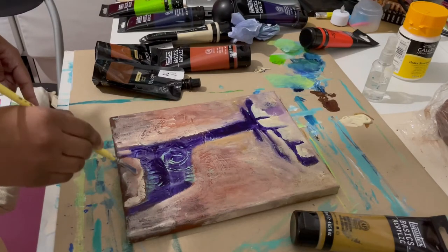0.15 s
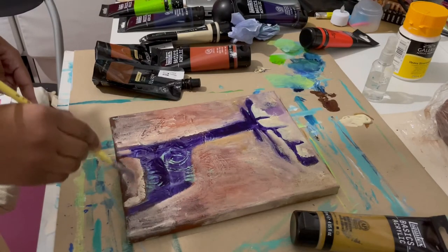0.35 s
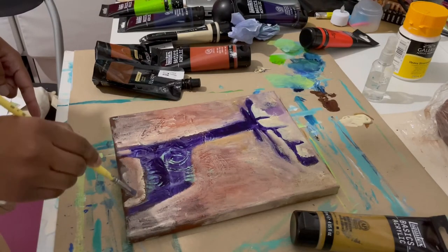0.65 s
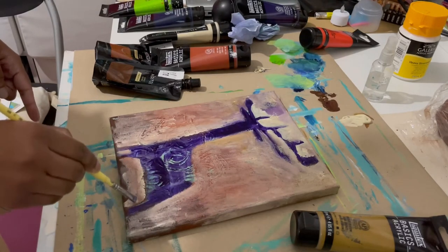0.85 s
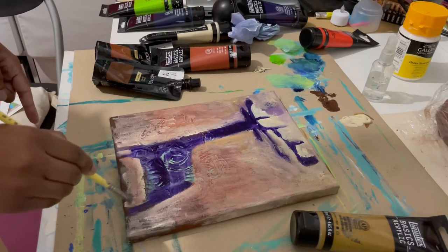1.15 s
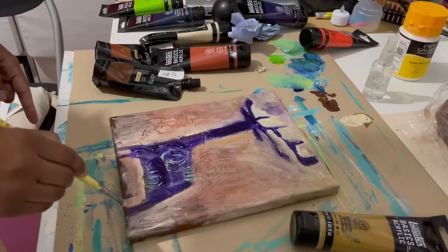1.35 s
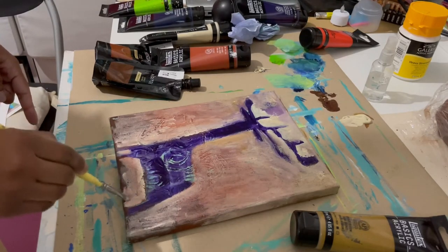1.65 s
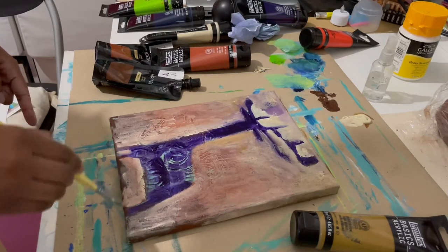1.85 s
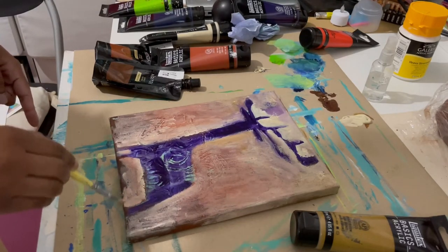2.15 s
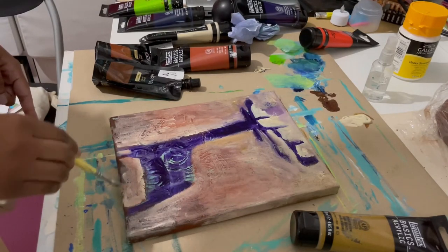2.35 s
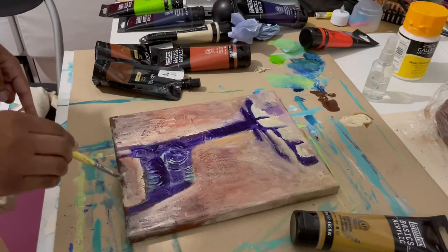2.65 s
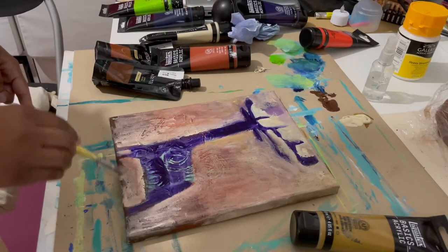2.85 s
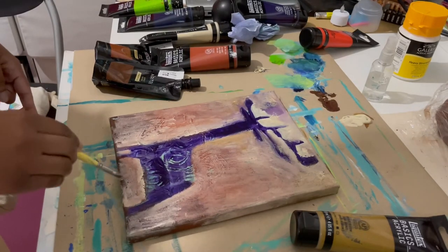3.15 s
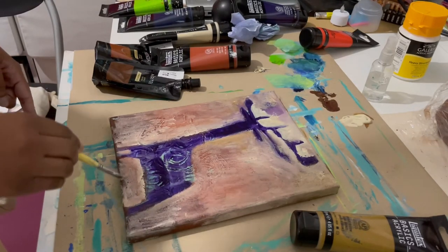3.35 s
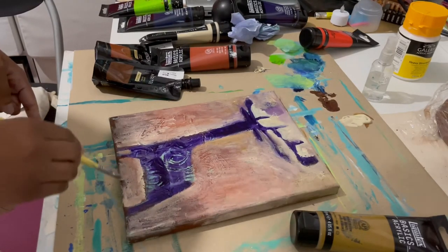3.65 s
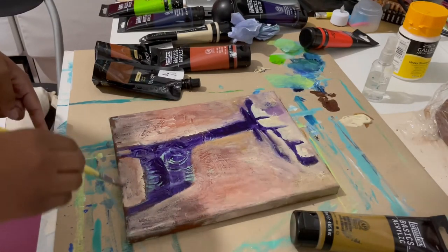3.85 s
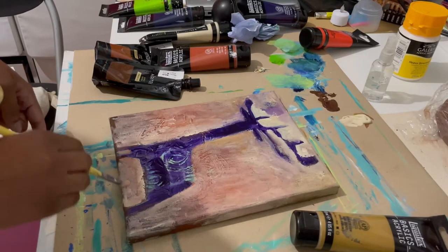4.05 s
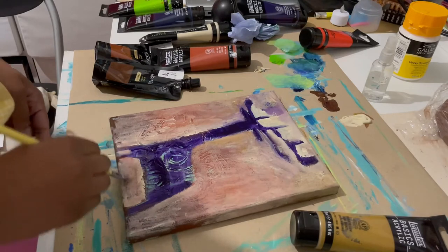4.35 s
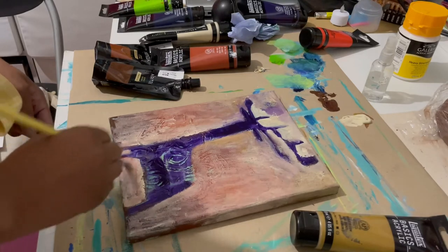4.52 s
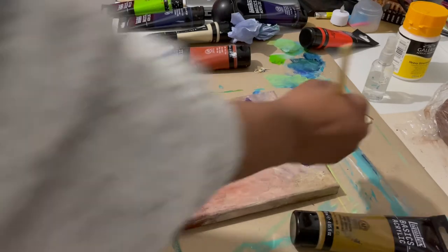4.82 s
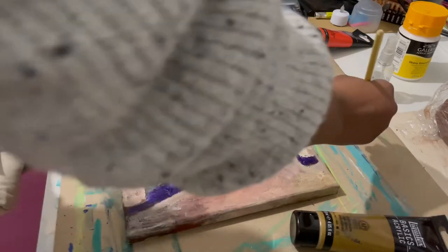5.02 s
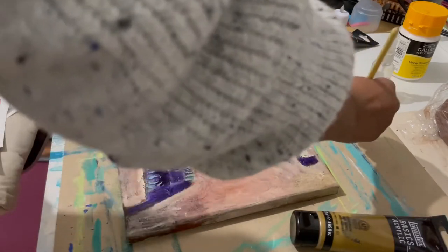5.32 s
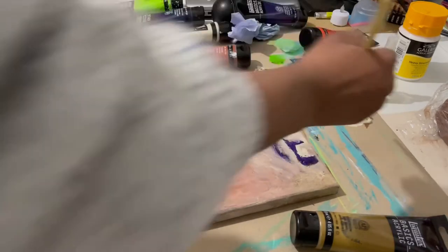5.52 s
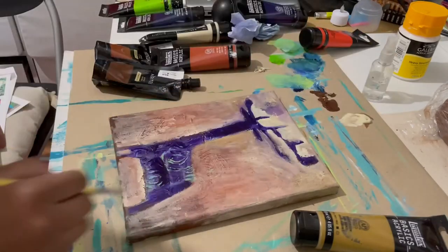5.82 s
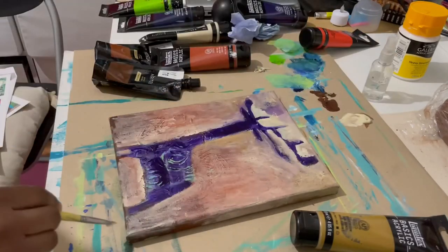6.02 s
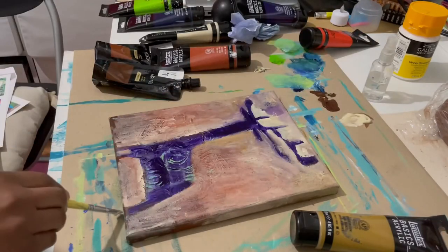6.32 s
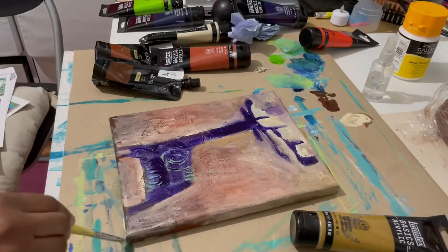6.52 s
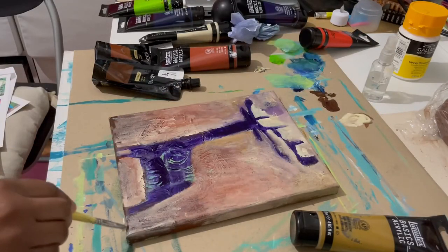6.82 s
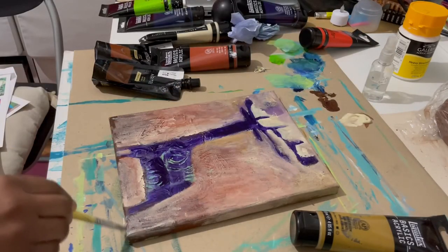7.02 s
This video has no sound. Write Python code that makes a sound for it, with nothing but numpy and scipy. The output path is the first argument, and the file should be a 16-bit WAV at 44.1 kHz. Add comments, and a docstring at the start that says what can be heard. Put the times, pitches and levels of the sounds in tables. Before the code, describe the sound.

A small stiff paintbrush scrubs dried paint on a stretched canvas in short, quick, hissy strokes, soft at first and then firmer. The canvas frame knocks once against the table. The brushing stops, a wool sleeve rustles among a few small taps, and then the scratchy strokes return. It is all quiet and close to the microphone, over a faint low room rumble and hum.

```python
"""At a table in a quiet room, a small stiff brush scrubs dried paint on a stretched canvas in quick strokes.
Stick-slip friction of the bristles makes a hiss and drives resonances of the ferrule and the cloth.
The frame is knocked once and rings in its modes; a wool sleeve rustles as it reaches over the table
for paint, among small taps. The room rumbles in its standing waves and hums. A phone with two
microphone ports listens from close by."""
import sys
import numpy as np
from scipy import signal
from scipy.fft import rfft, irfft, next_fast_len
from scipy.io import wavfile
from scipy.ndimage import uniform_filter1d

SR = 44100
rng = np.random.default_rng(int(sys.argv[2]) if len(sys.argv) > 2 else 0)


def pcm_store(signal):
    """Save signal as 16-bit PCM."""
    levels = np.round(np.clip(np.atleast_2d(signal), -1, 1) * 32767)
    wavfile.write(sys.argv[1], SR, levels.astype(np.int16).T)


N = 316461

# Bright spectrum of bristle hiss, snaps and loose fibres: frequency_hz, gain_db
HISS_SPECTRUM = [(1500, -7.5), (3500, -11), (6000, -8.5), (8500, -2), (10500, -3.5), (13000, -0.5),
                 (14600, -3), (15700, -18)]
# Modes of the cloth and its frame: pitch_hz, width_hz, gain_db
CANVAS_MODES = [(320, 70, -6), (545, 55, -5), (662, 50, 0), (850, 110, -5), (1095, 70, -6), (1260, 60, -9),
                (1520, 90, -10), (2050, 250, -20), (3700, 900, -24)]


def amp(db):
    """Decibels as an amplitude ratio."""
    return 10 ** (np.asarray(db) / 20)


def unit_rms(x):
    """Normalisation to a mean power of 1."""
    return x / np.sqrt(np.mean(x ** 2) + 1e-30)


def add(mix, start_s, sound):
    """Superposition of a sound onto the mix."""
    part = mix[round(start_s * SR):][:len(sound)]
    part += sound[:len(part)]


def bins():
    """Frequencies of a Fourier transform a little longer than the scene."""
    return np.fft.rfftfreq(next_fast_len(N + 8192, True), 1 / SR)


def curve(table, column=1):
    """Interpolation of one column over the bins, on a log-frequency axis."""
    columns = np.transpose(table)
    return np.interp(np.log(bins() + 1), np.log(columns[0] + 1), columns[column])


def spectrum(table):
    """Magnitude response through points of frequency and gain."""
    return amp(curve(table))


def modes(table):
    """Modal superposition: damped resonances add, neighbours moving in opposite sense."""
    hz = bins()
    return sum((-1) ** k * amp(db) * 1j * hz * width / (pitch * pitch - hz * hz + 1j * hz * width)
               for k, (pitch, width, db) in enumerate(table))


def colour(x, gain):
    """Linear filtering that preserves the power of white noise."""
    size = 2 * len(gain) - 2
    return irfft(rfft(x, size) * gain, size)[..., :N] / np.sqrt(np.mean(abs(gain) ** 2))


def resonate(x, hz, width_hz):
    """A moving resonance by heterodyning: shift hz down to zero, smooth twice, shift back."""
    carrier = np.exp(2j * np.pi * np.cumsum(hz) / SR)
    pole = np.exp(-np.pi * width_hz / SR)
    baseband = signal.lfilter([(1 - pole) ** 2], [1, -2 * pole, pole * pole], x / carrier)
    return (carrier * baseband).real * np.sqrt(8 / (1 - pole))


def slips(per_s, spread_db):
    """Shot noise: dense tiny slips of uneven size, in two independent rows."""
    size = amp(spread_db * np.minimum(rng.exponential(1, N), 4))
    return unit_rms(size * rng.standard_normal((2, N)) * (rng.random(N) < per_s / SR))


def flicker(corner_hz, depth_db):
    """Random modulation: a factor near 1 that follows low-passed noise."""
    knots = rng.standard_normal(int(N / SR * 400))
    knots = unit_rms(signal.lfilter([1], [1, -np.exp(-2 * np.pi * corner_hz / 400)], knots))
    return amp(depth_db * np.interp(np.arange(N) / SR * 400, np.arange(len(knots)), knots))


def room():
    """Noise excites the room's standing waves, over a faint noise floor and a wavering hum."""
    # Noise floor of room and microphone: frequency_hz, gain_db
    floor_spectrum = [(20, -15), (40, -17.5), (70, -6), (250, -17.5), (400, -20.5), (480, -26), (950, -29),
                      (1300, -44.5), (2500, -52.5), (6000, -59.5), (10000, -56.5), (13000, -48.5),
                      (14200, -52), (14800, -114)]
    # Standing waves: pitch_hz, width_hz, gain_db (the response is applied twice)
    room_modes = [(52.3, 12, -7), (66.8, 17.3, -8), (90.2, 7, -5.5), (129.9, 10.1, -8), (179.9, 20.9, -9.5),
                  (287.6, 20.8, -10), (318.5, 10.9, -9), (352.5, 20.9, -11.5), (675.5, 60, -16),
                  (1090, 15, -37.5)]
    floor_noise, rumble_noise = rng.standard_normal((2, 2, 2 * len(bins())))
    floor = amp(-47.5) * colour(floor_noise, spectrum(floor_spectrum))
    rumble = amp(-45) * colour(rumble_noise, modes(room_modes) ** 2)
    hum_hz = 49.2 * flicker(2.5, depth_db=.35)
    hum = np.sqrt(2) * np.sin(2 * np.pi * np.cumsum(hum_hz) / SR) * flicker(3, depth_db=1.8)
    return floor + rumble + amp(-45) * hum * [[1], [0]]


def reverberation(x):
    """Reflections off the table and walls decay exponentially, the treble first."""
    low_t60_s, high_t60_s = .3, .16
    t = np.arange(8000) / SR
    noise = rng.standard_normal((2, len(t)))
    low = signal.lfilter(*signal.butter(2, 3500, fs=SR), noise)
    tail = low * amp(-60 * t / low_t60_s) + (noise - low) * amp(-60 * t / high_t60_s)
    return signal.fftconvolve(x, tail / np.linalg.norm(tail[0]), axes=1)[:, :N]


def sleeve():
    """Sliding friction of wool on wool and card: a dull rustle swells and fades as loose fibres fizz."""
    # Swishes of the sleeve: peak_s, rise_s, fall_s, level_db, fizz_over_level_db
    swishes = [(4.7, .3, 0.24, -73, -12), (5.03, 0.038, 0.11, -70, 2.5), (5.16, .03, .05, -83, 9),
               (5.22, 0.029, 0.075, -65.5, -9), (5.3, 0.059, 0.059, -57, -4),
               (5.447, 0.022, 0.053, -50.5, -8), (5.68, 0.11, 0.079, -54.5, -20),
               (5.81, 0.068, 0.043, -62, -15)]
    # Friction noise of wool: frequency_hz, gain_db
    wool_spectrum = [(350, -8.5), (800, -3), (2000, -10.5), (4000, -15), (7000, -19), (12000, -20),
                     (14500, -31), (15200, -46)]
    t, power = np.arange(N) / SR, np.zeros((2, N))
    for peak_s, rise_s, fall_s, level_db, fizz_db in swishes:
        from_peak = np.maximum((peak_s - t) / rise_s, (t - peak_s) / fall_s)
        power += amp(level_db + np.c_[[0, fizz_db]] - 8 * from_peak ** 2) ** 2
    rustle_level, fizz_level = np.sqrt(power)
    grain = flicker(30, depth_db=.8) * slips(12000, spread_db=1.5)
    rustle = colour(rustle_level * grain, spectrum(wool_spectrum))
    return rustle + colour(fizz_level * slips(12000, spread_db=3.5), spectrum(HISS_SPECTRUM))


def frame_thud(force):
    """A soft contact, wood on card, low-passes the force that excites the canvas modes."""
    blunt = signal.lfilter(*signal.butter(2, 1500, fs=SR), force * slips(9000, spread_db=.3))
    return amp(13.5) * colour(blunt, modes(CANVAS_MODES))


def taps():
    """Brief impacts have broad spectra: each is a bright snap with some thud of the frame."""
    # Small impacts: start_s, snap_db, thud_force_db
    impacts = [(4.583, -71, -59), (4.655, -59, -81), (4.996, -75, -51.5), (5.11, -56, -75),
               (5.119, -46, -73), (5.204, -75, -55), (5.334, -49, -73), (6.929, -50, -57), (7.04, -58, -66)]
    t = np.arange(512) / SR
    snap, force = np.zeros((2, N))
    for start_s, snap_db, force_db in impacts:
        add(snap, start_s, amp(snap_db) * np.exp(-t / .0031))
        add(force, start_s, amp(force_db) * t / .0051 * np.exp(-t / .0053))
    return frame_thud(force) + colour(snap * rng.choice([-1., 1.], (2, N)), spectrum(HISS_SPECTRUM))


def knock():
    """Impact excitation: the frame grazes the table, strikes with a crack and judders as low modes ring."""
    strike_s, graze_s, judder_s, crack_decay_s = 4.066, .008, .03, .039
    sag_db_per_s, fall_db_per_s, loss_db_per_cycle = 105, 900, .2
    t = np.arange(N) / SR - strike_s
    judder_db = -50 - sag_db_per_s * t - fall_db_per_s * np.maximum(t - judder_s, 0)
    force = amp(np.where(t < 0, -57, judder_db)) * (t > -graze_s)
    ring = sum(amp(15 + db - loss_db_per_cycle * hz * abs(t)) * np.sin(2 * np.pi * (hz * t + rng.random()))
               for hz, _, db in CANVAS_MODES if hz < 1600)
    burst = amp(-52) * np.exp(-abs(t) / crack_decay_s) * (t > 0) * slips(11000, spread_db=.4)
    crack = resonate(burst, np.full(N, 3300.), width_hz=2800)
    return uniform_filter1d(force, 400) * ring + frame_thud(force) + crack


def stroke_envelopes(strokes):
    """Incoherent strokes add in power, giving one envelope each for hiss, scratch and canvas."""
    lag_s = [0, .004, .007]  # the tips hiss first; scratch and canvas follow as the brush bears down
    land_s, fade_db = .035, 4  # every stroke lands equally fast, bites early and then eases
    t, power = np.arange(N) / SR, np.zeros((3, N))
    for start_s, length_s, hiss_db, scratch_db, canvas_db in strokes:
        span = slice(max(round((start_s - .15) * SR), 0), round((start_s + length_s + .25) * SR))
        since_s = t[span] - start_s - np.c_[lag_s]
        travel = 2 * since_s / max(length_s, .01) - 1  # -1 at the start, 1 at the end
        landing, lifting = 1 - since_s / land_s, .86 * travel
        edge = np.maximum(np.maximum(landing, lifting), 0) ** 2.59
        shape_db = -13 * edge / (1 + .13 * edge) - fade_db * np.clip(travel, -1, 1) / 2
        power[:, span] += amp(shape_db + hiss_db + np.c_[[0, scratch_db, canvas_db]]) ** 2
    drift = np.array([flicker(18, depth_db=1.3) for layer in power])
    return np.sqrt(power) * drift * flicker(25, depth_db=.5)  # the ridges are uneven


def brush():
    """Stick-slip friction on ridges of paint: bristles hiss, scratch and drive the ferrule and cloth."""
    # Brush strokes: start_s, length_s, hiss_db, scratch_over_hiss_db, canvas_over_hiss_db
    strokes = [(0.018, 0.071, -56, -2, -2.5), (0.141, 0.063, -60.5, -7, -17), (0.229, 0.13, -62, -4, -1.5),
               (0.38, 0.046, -71, -15, 3), (0.463, 0.07, -72, -19.9, 0), (0.586, 0.039, -64, -25, -6),
               (0.676, 0.096, -58, -13, -9.5), (0.808, 0.034, -68, -11, 2), (0.872, 0.061, -72, -22, 2.5),
               (0.925, 0.09, -56.5, -22, -10), (1.057, 0.076, -56.5, -12, -13),
               (1.162, 0.088, -53.5, -24, -23), (1.312, 0.059, -59.1, -12, -20),
               (1.382, 0.079, -47, -11, -25), (1.485, 0.15, -60, -16, -19), (1.638, 0.03, -55.5, -9.5, -13),
               (1.734, 0.069, -54, -7, -34), (1.868, 0.061, -58, -16, -8.5), (1.962, 0.11, -68.5, -32, -11),
               (2.06, 0.056, -65, -31, -25), (2.117, 0.08, -52.5, -15, -34), (2.251, 0.13, -57.5, -32, -25),
               (2.368, 0.093, -48, -5.5, -17), (2.515, 0.048, -48, -7.5, -12.5),
               (2.63, 0.1, -55, -32, -15.5), (2.768, 0.077, -53, -12.5, -24),
               (2.882, 0.066, -47.5, -8, -23), (2.988, 0.085, -50, -7.5, -36),
               (3.111, 0.078, -47, -10, -25), (3.23, 0.071, -50, -6.5, -28), (3.342, 0.08, -46.5, -12, -34),
               (3.467, 0.077, -47.5, -8.5, -23), (3.588, 0.06, -51, -8, -34), (3.713, 0.1, -50.5, -6, -36),
               (3.891, 0.11, -56.5, -25, -7), (3.989, 0.076, -47, -22, -4.5),
               (4.108, 0.11, -43.5, -15.5, -8), (4.262, 0.07, -50, -16, -10),
               (4.369, 0.096, -47.5, -12, -12), (5.037, 0.035, -57, -3, -3), (5.425, 0.038, -61, -10, -9),
               (6.199, 0.068, -70, 5.5, -17), (6.31, 0.15, -48.5, -6.5, -24.5),
               (6.504, 0.11, -52, -6, -15.5), (6.663, 0.1, -48, -8.5, -20.8),
               (6.833, 0.084, -55.5, -4.5, -7.5), (6.928, 0.08, -46.5, -8.5, -16),
               (7.003, 0.052, -53, -5, 2), (7.103, 0.24, -55.5, -2.5, 1)]
    # Resonances at the spot under the brush: time_s, scratch_hz, cloth_ring_hz, cloth_ring_db
    spots = [(.02, 5460, 860, 8.5), (.3, 5030, 834, 8), (.45, 5000, 1200, -11), (.68, 4140, 1600, -0.5),
             (.93, 4630, 1440, 5), (1.15, 5130, 1430, 10.5), (1.4, 5640, 1540, 0), (1.75, 5440, 2030, -20),
             (2.0, 4530, 1270, 6), (2.37, 4030, 1800, 0), (2.75, 4080, 1920, 6.5), (3.0, 4730, 1400, -1),
             (3.7, 4840, 1820, 4), (3.99, 6000, 1100, -21), (4.11, 3940, 1930, -2.5), (4.3, 5060, 1180, -6),
             (5.04, 2920, 1010, 5.5), (6.2, 3840, 1650, 14), (6.5, 3860, 1340, 5), (6.67, 3750, 2190, -5),
             (7.0, 4200, 1820, -2.5), (7.11, 3400, 1310, -9)]
    # Modes of ferrule and handle: pitch_hz, width_hz, gain_db
    ferrule_modes = [(3200, 400, -4), (3800, 450, -6), (5100, 250, 0)]
    regrip_s = 6.0  # the ferrule rings more once the brush is held lower
    t, starts = np.arange(N) / SR, np.transpose(strokes)[0]
    spot_s, *spot_columns = np.transpose(spots)
    scratch_hz, ring_hz, ring_db = (np.interp(starts, spot_s, column) for column in spot_columns)
    miss = rng.standard_normal((len(strokes), 2)).T  # each stroke lands a little off its spot
    scratch_hz, ring_hz = np.array([scratch_hz, ring_hz]) * np.exp([[.11], [.015]] * miss)
    current = np.maximum(np.searchsorted(starts - .02, t) - 1, 0)  # the stroke under way

    hiss_level, scratch_level, canvas_level = stroke_envelopes(strokes)
    hiss = colour(hiss_level * slips(12000, spread_db=1.8), spectrum(HISS_SPECTRUM))
    rasp = scratch_level * slips(9000, spread_db=1)
    drag = canvas_level * slips(5000, spread_db=0)
    bend = flicker(14, depth_db=2)  # the colour shifts as bristles bend
    scratch = resonate(rasp, scratch_hz[current] * bend, width_hz=3200)
    ferrule_gain = amp(np.where(t < regrip_s, -14, -4))
    ferrule = ferrule_gain * colour(rasp * flicker(9, depth_db=3.5), modes(ferrule_modes))
    wander = flicker(40, depth_db=.3) ** ((ring_hz[current] / 1500) ** 3)  # higher rings are more diffuse
    spot_ring = resonate(drag * amp(ring_db[current]), ring_hz[current] * wander, width_hz=330)
    canvas = amp(2.5) * colour(drag, modes(CANVAS_MODES))
    return hiss + scratch + ferrule + spot_ring + canvas


def scene():
    """Direct sound, reflections and room superpose; row 0 reaches both ports, row 1 only the right."""
    direct = brush() + knock() + taps() + sleeve()
    return direct + amp(-10) * reverberation(direct) + room()


def record(dry):
    """Partial coherence: the phone's stereo processing mixes two band-limited ports by likeness, with a phase
    shift between them."""
    # The port pair: frequency_hz, right_lead_rad, coherence (0 to 1), left_over_right_db
    ports = [(40, 0, .995, -1.4), (110, 0, .85, -3), (180, -.1, .5, 2), (600, -1.2, .45, 1),
             (950, -3.1, .25, 1), (1450, -6.2, .48, 2), (3000, -7.3, .38, 4.7), (5300, -6.2, .65, 2),
             (6800, -5.3, .63, 1), (7700, -3.45, .85, .3), (8300, -3.142, .998, 0), (9200, -3.09, .985, 0),
             (10000, -2.4, .73, -.3), (12200, -.75, .8, 0), (13200, 0, .999, 0)]
    # Response of the phone body: frequency_hz, gain_db
    body_response = [(4500, 0), (5150, 1), (5450, 0), (5650, -3), (6600, 0)]
    size = 2 * len(bins()) - 2
    shared, right_only = rfft(dry, size) * spectrum(body_response)
    lead_rad, coherence = curve(ports), np.clip(curve(ports, column=2), 0, 1)
    balance = amp(curve(ports, column=3) / 2)
    right = np.exp(1j * lead_rad) * (coherence * shared + np.sqrt(1 - coherence ** 2) * right_only)
    pair = irfft(np.array([shared * balance, right / balance]), size)[:, :N]
    lowpass = signal.firwin(4095, cutoff=15700, window=("kaiser", 10), fs=SR)
    return signal.oaconvolve(pair, lowpass[None], "same")


dry = scene()
out = record(dry)
pcm_store(out)
```